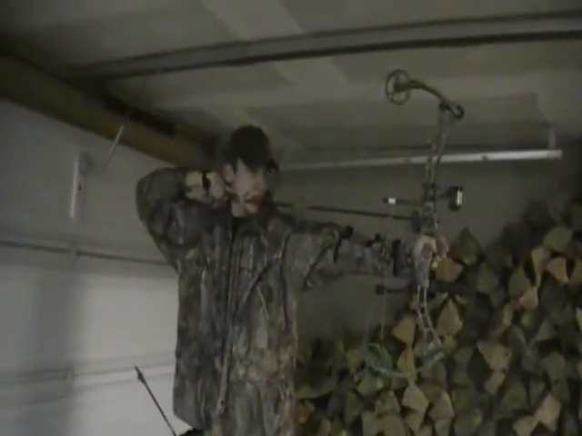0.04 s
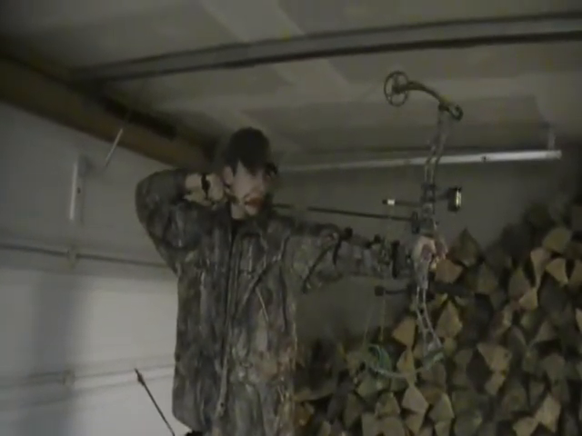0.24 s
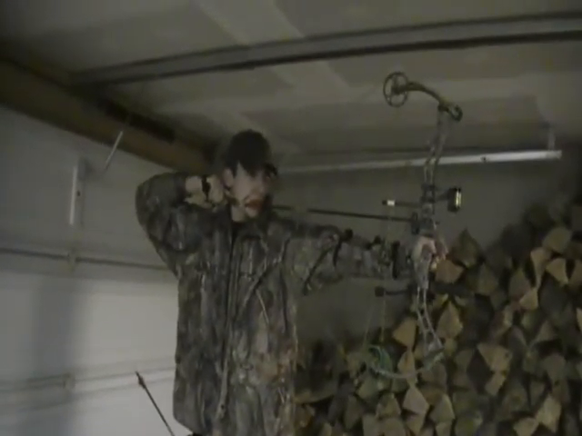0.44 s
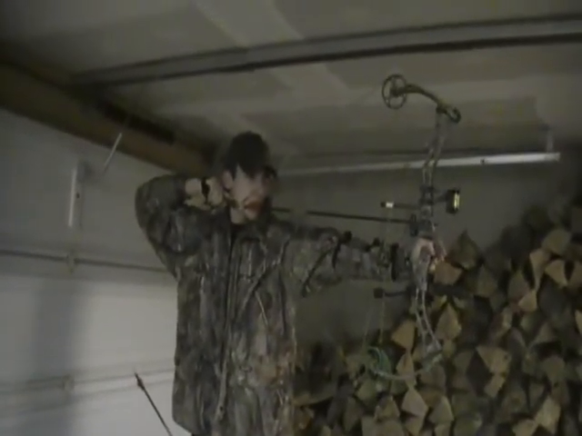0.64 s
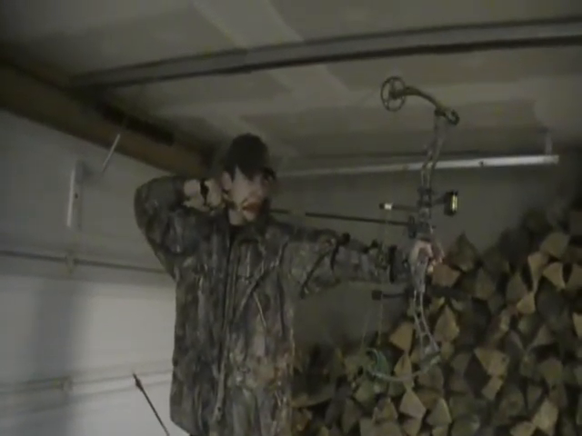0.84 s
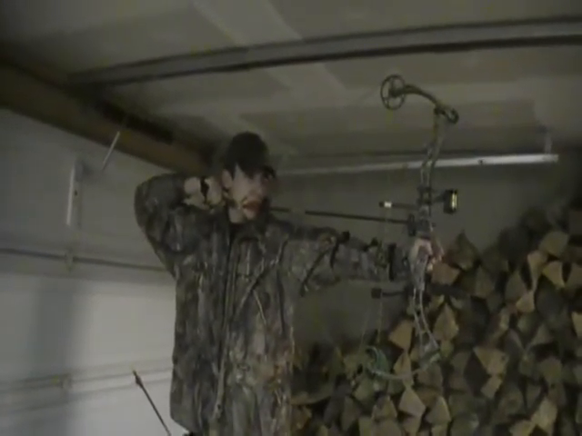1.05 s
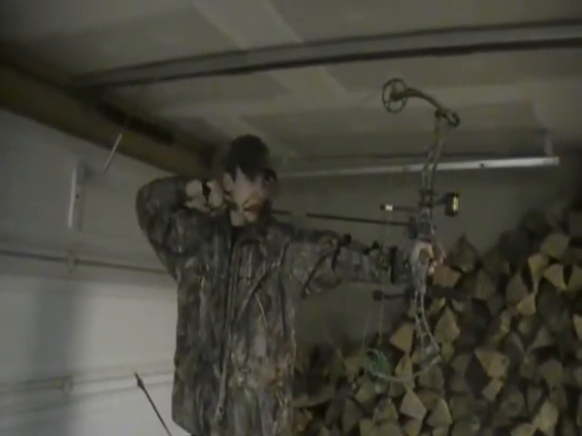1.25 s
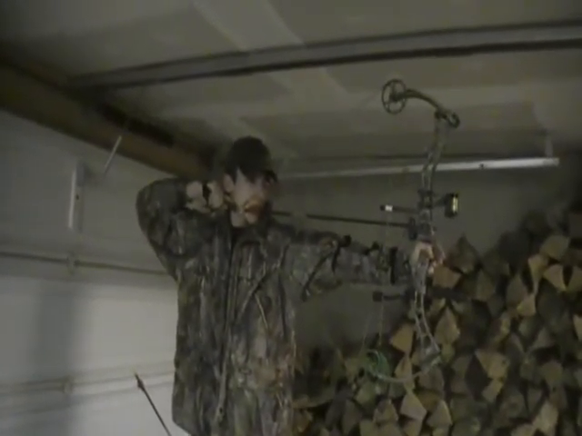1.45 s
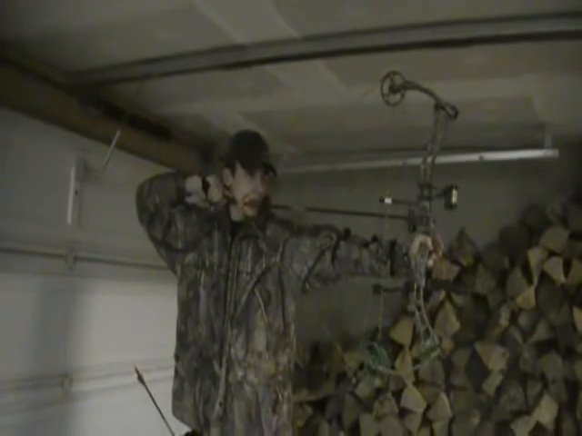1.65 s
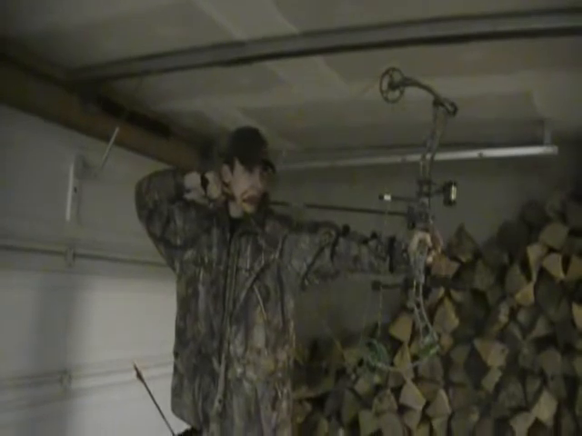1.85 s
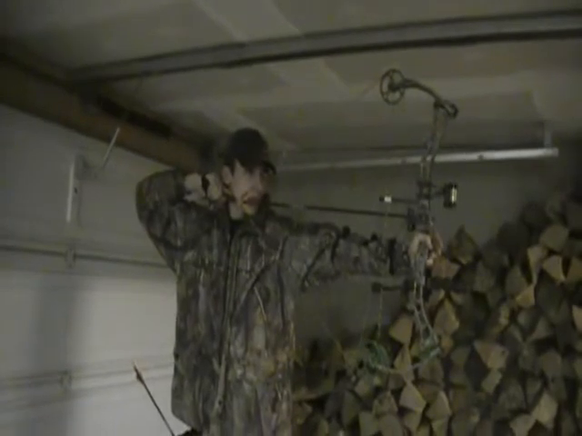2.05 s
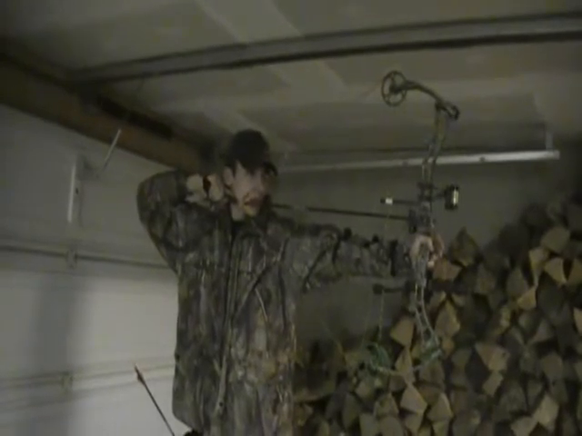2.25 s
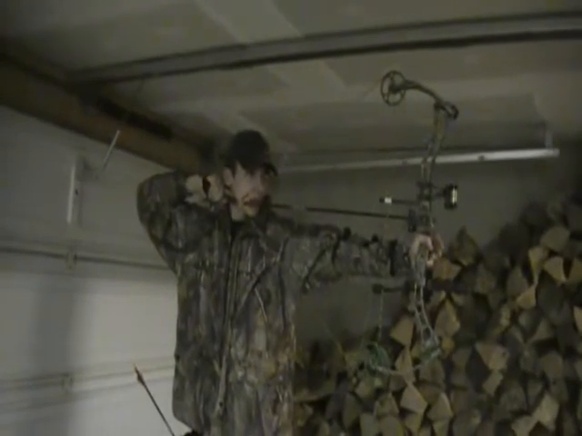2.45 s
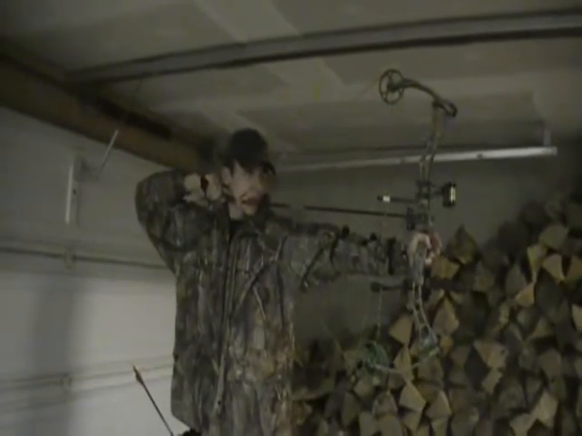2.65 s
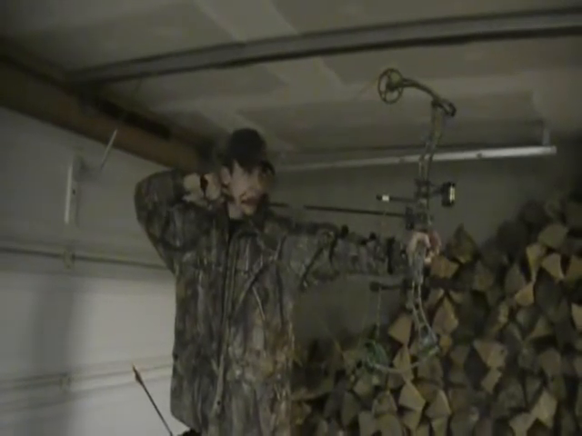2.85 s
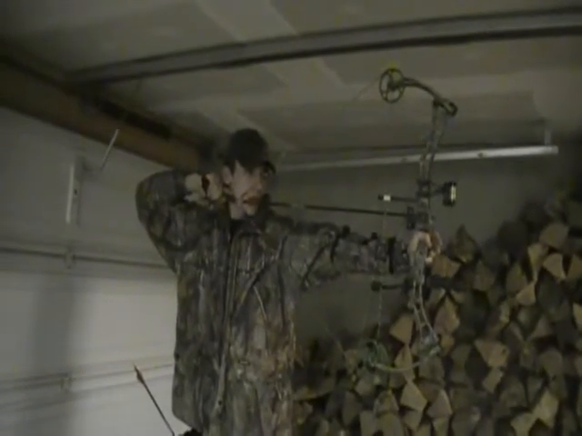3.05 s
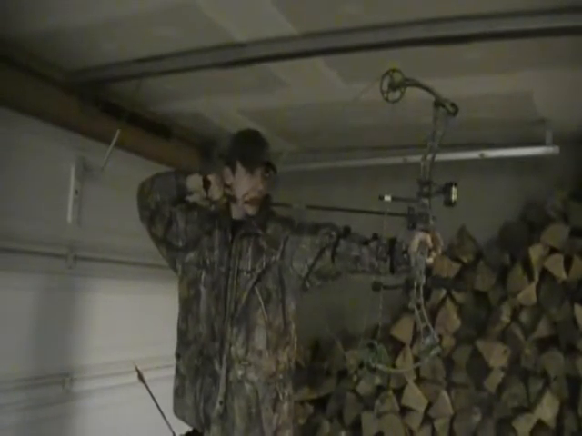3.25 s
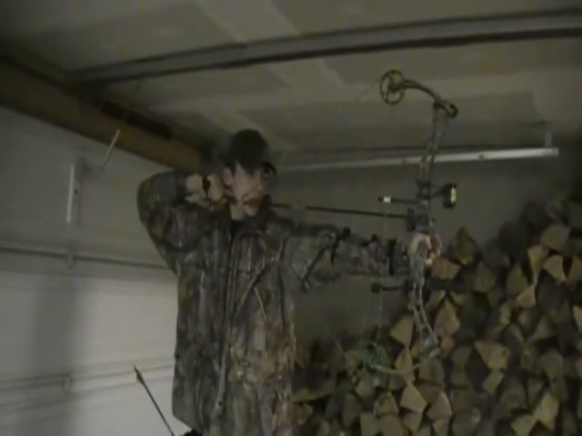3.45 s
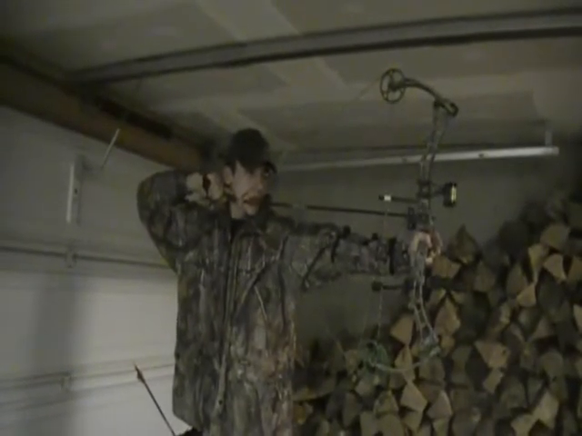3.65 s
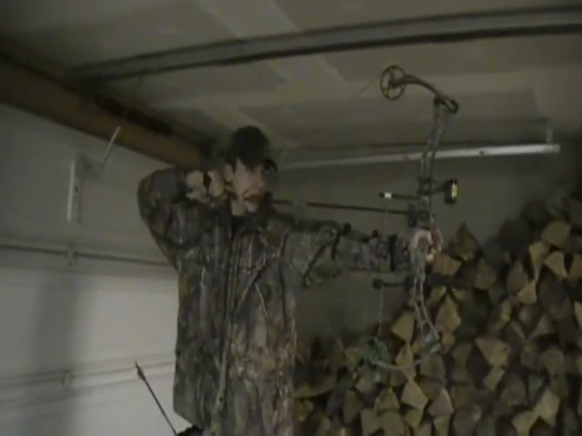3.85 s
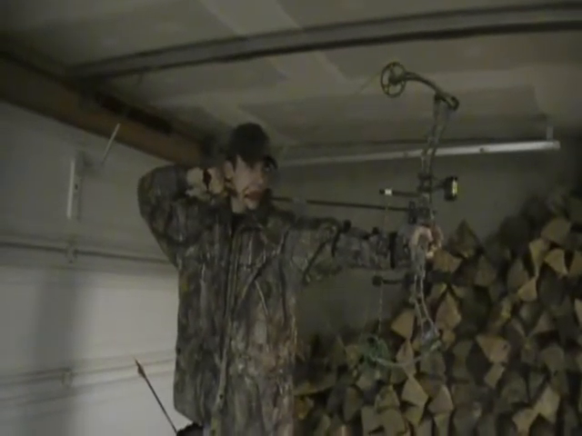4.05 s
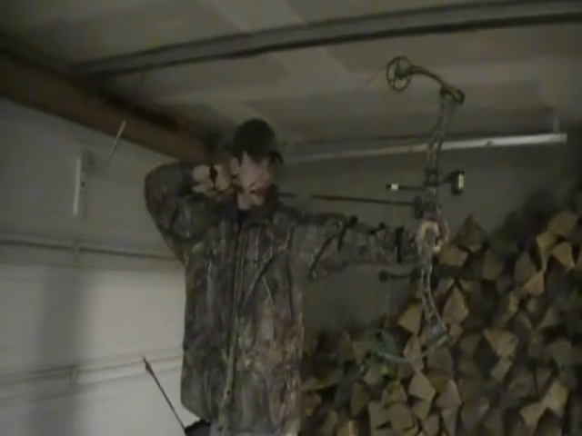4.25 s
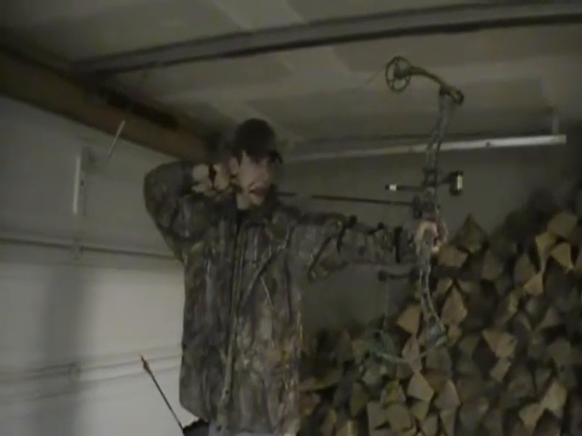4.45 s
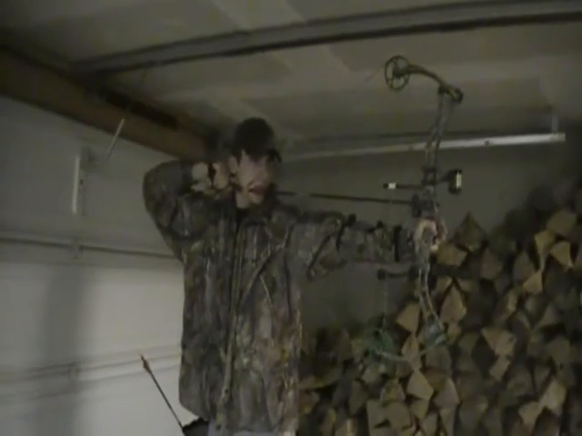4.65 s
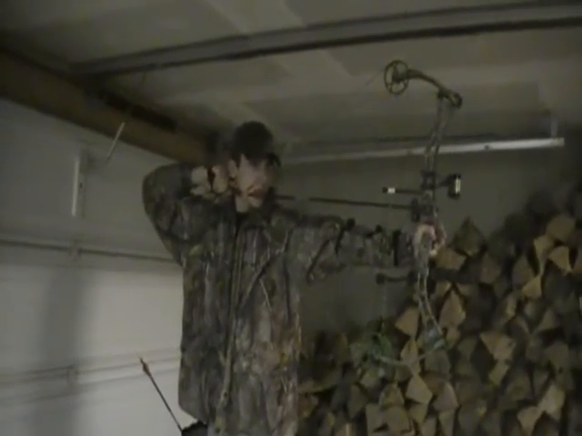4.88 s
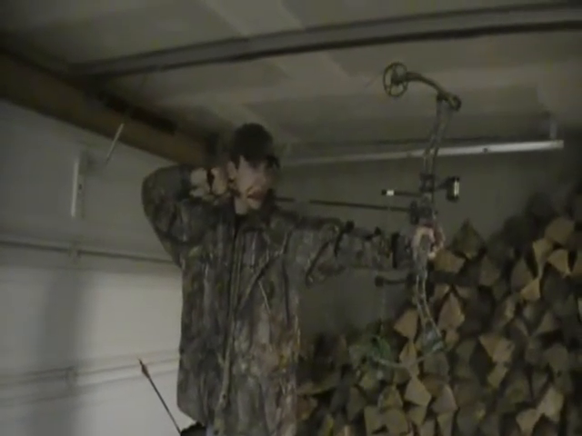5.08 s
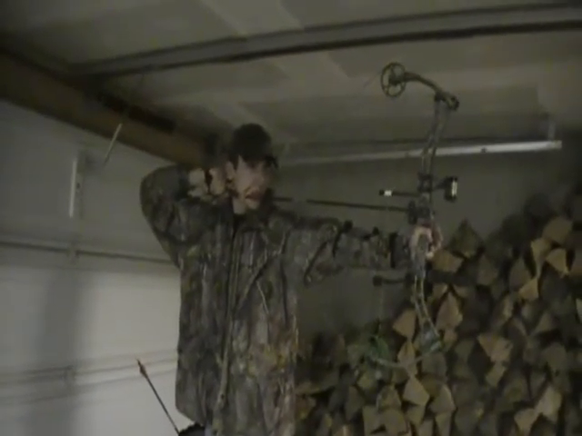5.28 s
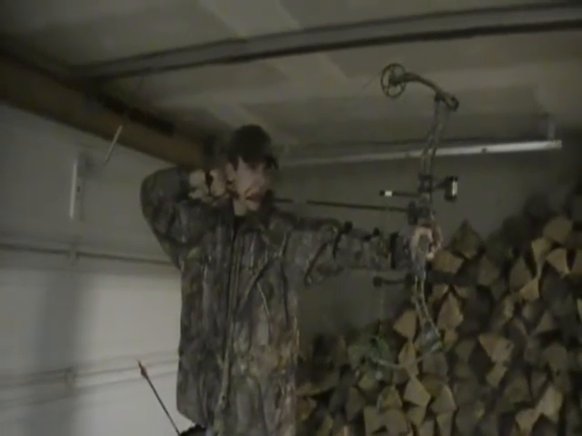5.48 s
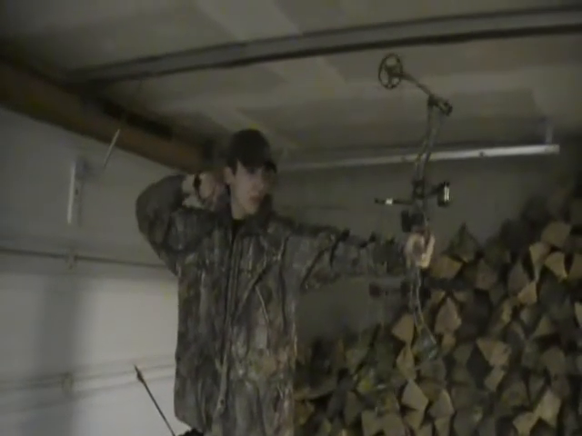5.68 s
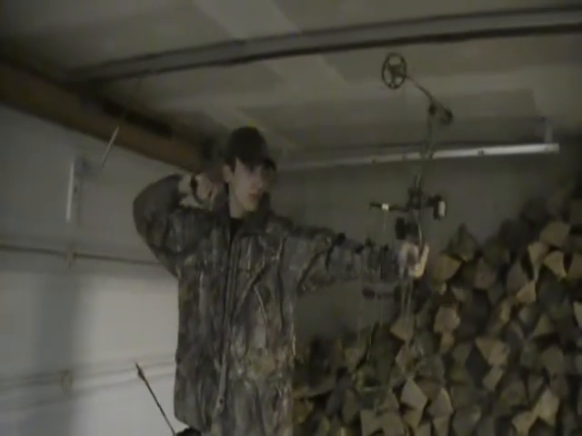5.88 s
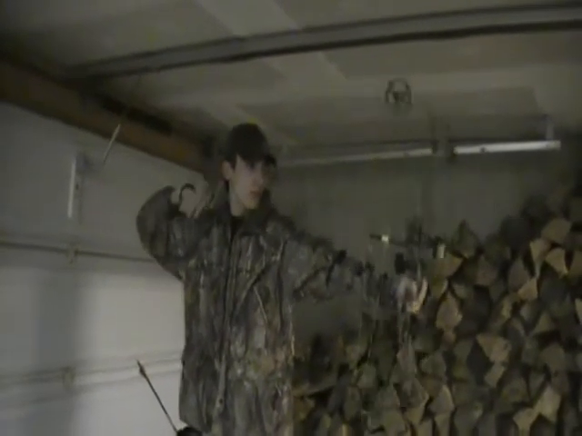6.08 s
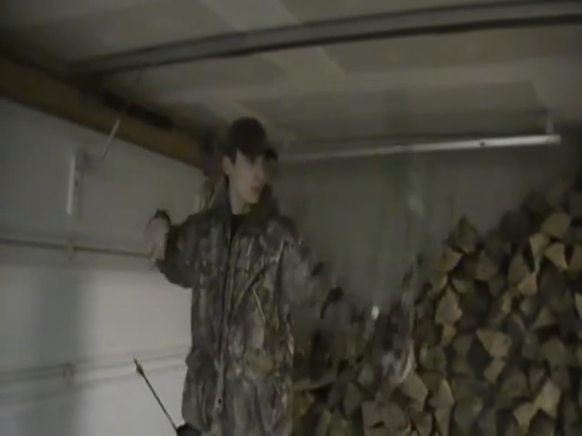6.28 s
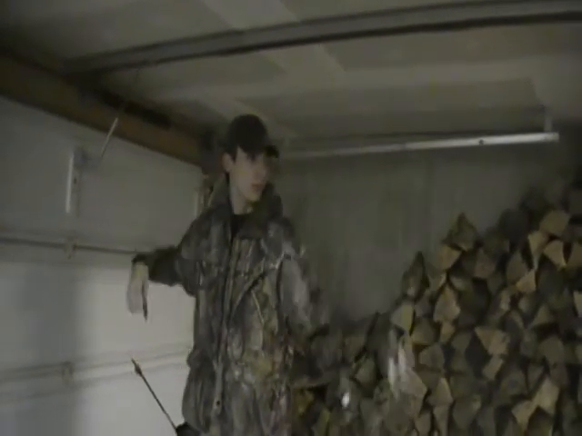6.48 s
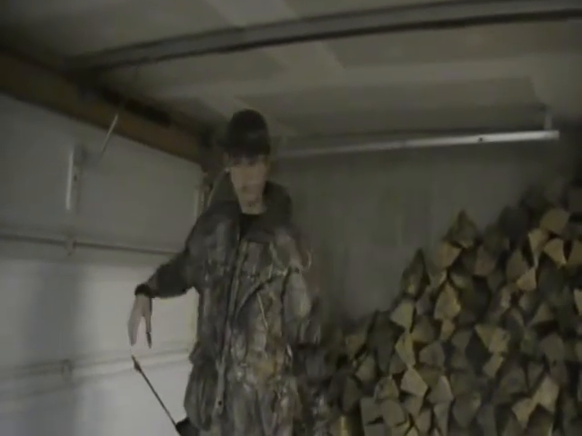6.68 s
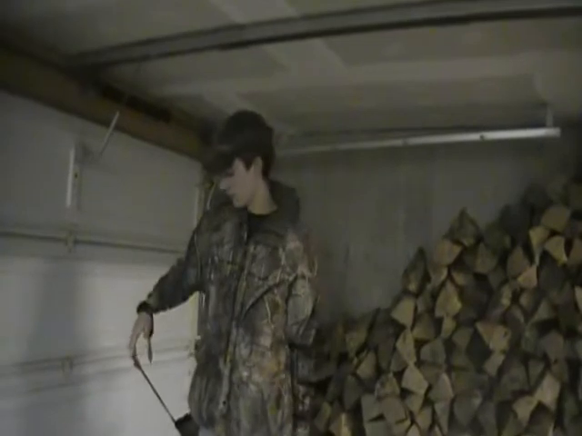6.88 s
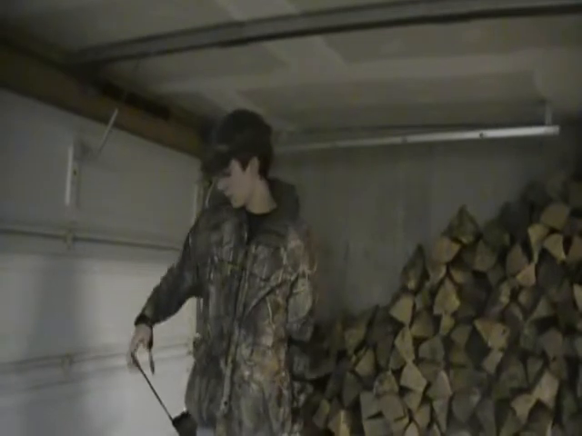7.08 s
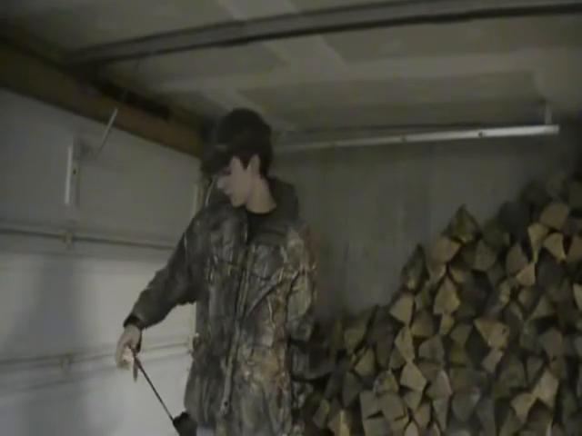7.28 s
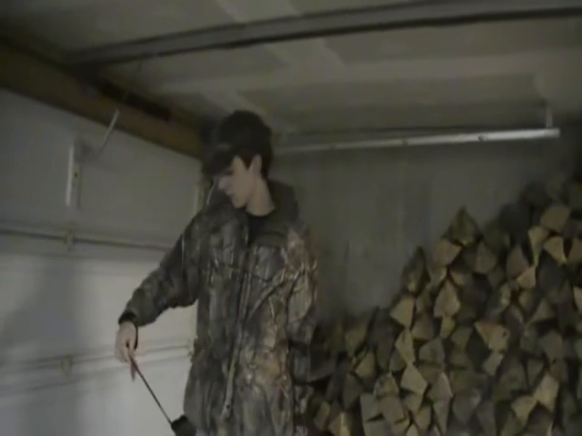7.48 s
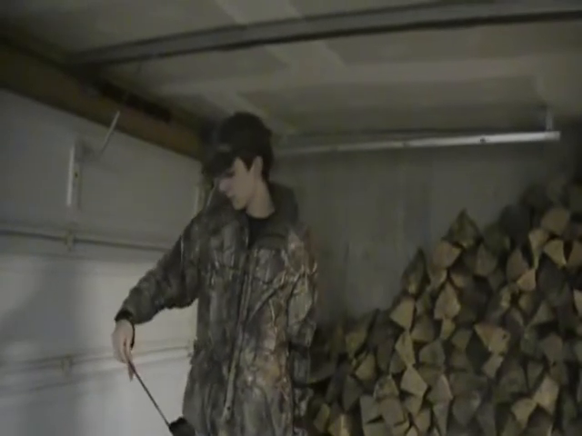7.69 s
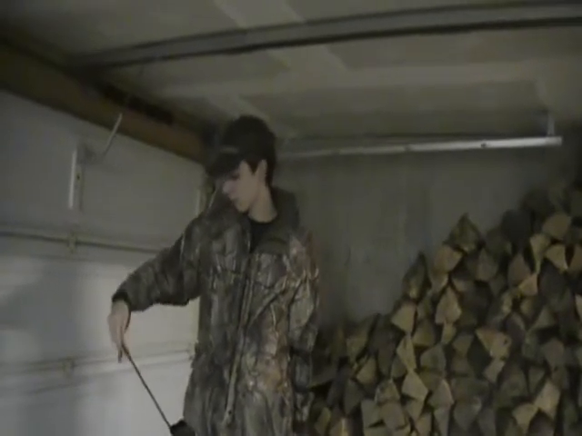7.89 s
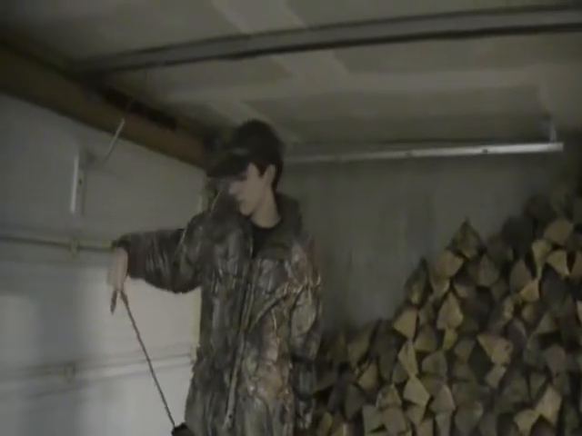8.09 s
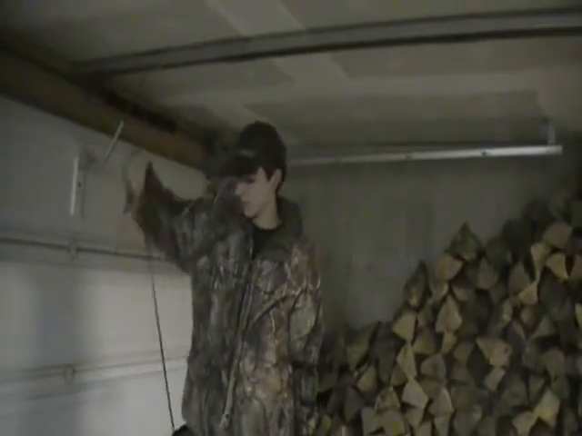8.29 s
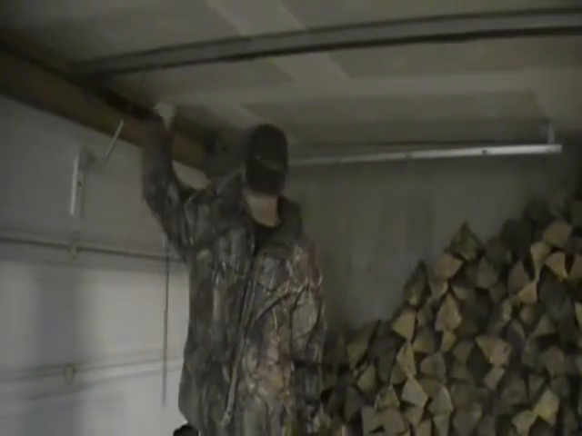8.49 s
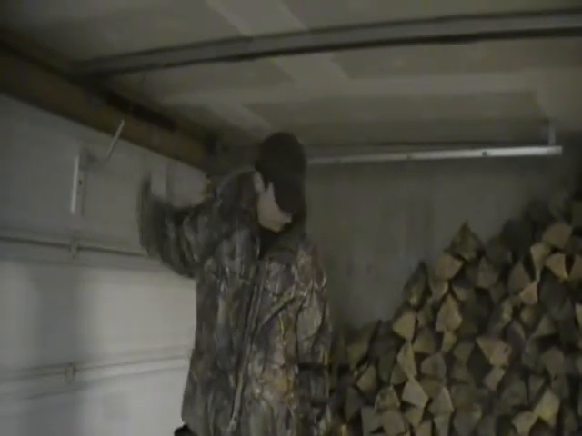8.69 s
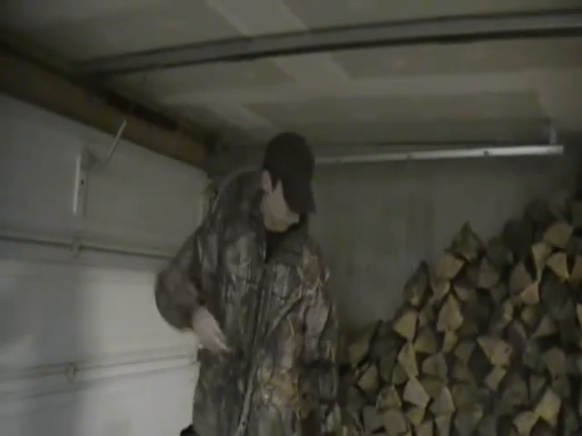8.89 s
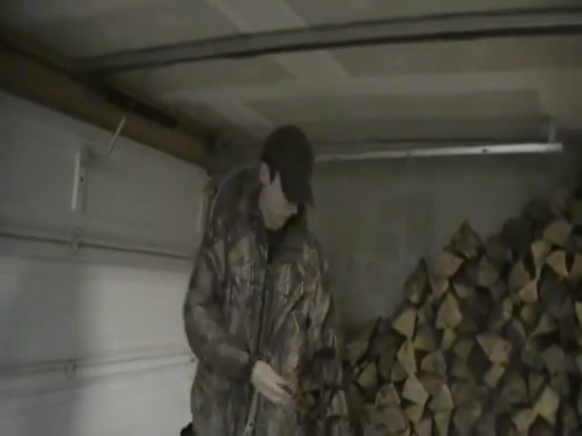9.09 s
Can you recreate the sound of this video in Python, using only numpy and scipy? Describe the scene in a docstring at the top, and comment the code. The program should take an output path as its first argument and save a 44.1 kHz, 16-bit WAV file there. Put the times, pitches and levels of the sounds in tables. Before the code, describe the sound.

In a quiet garage, close camera microphone hiss and brief lens-motor whirs fill a long hold, with one faint creak from the drawn bow. The release cracks very loudly, with a tiny zip and a low shudder; almost at once a distant target answers with a hard smack and a ringing tail. Then a jacket rustles softly, small parts tick, and an arrow scrapes out of its holder.

```python
"""Bow shot in a garage

A compound bow is held at full draw, close to a hissy camera whose lens motor whirs in runs over a faint idle.
The release snaps as sharp contacts, the arrow zips as a rising rub, and the limbs thump as ringing modes and
reverberation; a sixth of a second later a far target answers with a smack and a long tail.
The jacket swishes as bands of fluttering noise while the archer lowers the bow; the next arrow then slides
out of its holder as scuff, rasp, song and hiss that follow its speed, and is lifted clear with small ticks.
"""
import sys
import numpy as np
from scipy import signal
from scipy.fft import rfft, irfft, next_fast_len
from scipy.io import wavfile

SR = 44100
rng = np.random.default_rng(int(sys.argv[2]) if len(sys.argv) > 2 else 0)


def master(y):
    """Save y as 16-bit WAV."""
    cut = np.clip(np.atleast_2d(y).T, -1, 1)
    pcm = np.round(cut * 32767)  # scale
    wavfile.write(sys.argv[1], SR, pcm.astype(np.int16))


N = 402633
TIME = np.arange(N) / SR
CUTOFF_HZ = 15900

# Colour tables list freq_hz, relative_db_per_hz: only their shape counts, as the noise is scaled to rms 1.
# Contact tables list width_hz for a click shaped by two passes of a resonance, each twice that wide.

# release jaw, string and nock: start_s, peak_db, centre_hz, width_hz, decay_s
RELEASE_SNAPS = [(5.5444, -12, 8600, 1200, 0.00033), (5.5455, -8, 9150, 2500, 0.00098),
                 (5.5500, 1.5, 9700, 1810, 0.00028), (5.5512, -14, 9900, 3520, 0.015),
                 (5.5546, -10, 9350, 3020, 0.0011), (5.5693, -1, 10600, 2200, 0.00079),
                 (5.5472, -28.5, 1900, 1600, 0.0033), (5.5926, -16, 7000, 2500, .0009)]
# the shaft speeding over the rest: start_s, pitch_hz, level_db
SHAFT_ZIP = [(5.5620, 1607, -33), (5.5635, 1995, -23), (5.5664, 3310, -24), (5.5679, 4000, -3.5),
             (5.5685, 4400, -14), (5.5692, 5600, -9), (5.5712, 6300, -28)]
# limbs and riser jolted at the end of the stroke: freq_hz, relative_db_per_hz
BOW_COLOUR = [(59, -53), (100, -25), (137, -34), (233, -13.5), (420, -11), (467, -7), (564, -12.5),
              (977, -5.5), (1060, -9), (1230, -3.5), (2520, -12), (10600, -5.5), (15500, -12.5)]
# their ringing modes: pitch_hz, peak_db, t60_s
BOW_MODES = [(246, -46.5, 0.58), (454, -43.5, 0.86)]
BOW_S, BOW_DB = 5.572, -19.5

# the smack and its hard reflections, before the hollow is cut: start_s, peak_db, centre_hz, width_hz, decay_s
TARGET_SMACKS = [(5.7043, -17, 1700, 2200, .0015), (5.7045, -21, 6000, 3500, .001),
                 (5.7093, -10, 1500, 1000, .003), (5.7152, -7, 6000, 2500, .0006),
                 (5.7181, -1, 6500, 4500, .0004), (5.7199, -9, 6500, 3000, .0004),
                 (5.7448, -8, 7000, 2500, .0008)]
# arrow in the target, heard down the garage: freq_hz, relative_db_per_hz
TARGET_COLOUR = [(50, -45), (95, -17.5), (200, -11.5), (265, -8), (500, -5.5), (760, -7.5), (1050, -1.5),
                 (1600, -1), (2200, -7), (3100, -22), (4400, -7), (6600, 1.5), (8000, -6), (12500, -13),
                 (15500, -29)]
# the booms it sets off: pitch_hz, peak_db, t60_s
TARGET_MODES = [(100.7, -55.5, 1), (193, -50.5, 0.82), (269, -41.5, 0.84), (1067, -40, 0.56),
                (1095, -43, 0.53), (1536, -36, 0.31), (1620, -50, .45)]
TARGET_S, TARGET_DB = 5.7085, -19.5

# speed of the next arrow sliding out of its holder, as its rasp level before trims: start_s, level_db
SLIDE_SPEED = [(7.76, -57.5), (7.86, -46.5), (7.908, -53), (7.955, -40.5), (8.06, -37), (8.11, -37.5),
               (8.168, -33), (8.205, -36), (8.258, -36.5), (8.305, -45.5), (8.45, -61.5)]
# the shaft catches on the holder, scuffs and sets it ringing; levels before trims:
# start_s, length_s, scuff_db, ring_db
HOLDER_CATCHES = [(7.738, 0.02, -50.5, -52), (7.806, 0.04, -50, -72), (8.085, 0.037, -44.5, -49),
                  (8.243, 0.028, -43, -49.5)]
CATCH_ATTACK_S, CATCH_RELEASE_S, HOLDER_RELEASE_S = 0.0076, 0.035, 0.04
HOLDER_HZ = 329.3
# the shaft's dull scuff: freq_hz, relative_db_per_hz
SCUFF_COLOUR = [(110, -50), (180, -23.5), (269, -8), (326, -5), (457, -6.5), (564, -5), (709, -4),
                (777, -5), (1600, -8), (2080, -19.5), (3520, -120)]
# its rasp: freq_hz, relative_db_per_hz
RASP_COLOUR = [(100, -58), (710, -26), (1200, -5), (1720, 0), (2010, 0.5), (2370, -1.5), (2590, -3),
               (3350, -0.5), (3770, -4), (4560, -3.5), (5060, -10.5), (7000, -13.5), (9100, -43),
               (15400, -120)]
# its hiss: freq_hz, relative_db_per_hz
SHAFT_HISS_COLOUR = [(3820, -36), (6500, -8), (7020, -7.5), (9350, -0.5), (10800, -2), (12900, -6),
                     (14700, -15), (15500, -19)]
# the zing rises in pitch with speed, by up to the rise
ZING_REST_HZ, ZING_RISE_HZ = 1500, 1307
# the shaft sings at full speed: its resonance, and its level before the grip and the room
SHAFT_HZ, SHAFT_WIDTH_HZ, SHAFT_DB = 3430, 350, -40

# speed of the arms, lowering the bow then reaching for the arrow, as the shell level before a trim:
# start_s, level_db
ARM_SPEED = [(6.05, -70), (6.27, -58), (6.6, -55.5), (6.7, -52), (6.88, -54), (7.0, -54), (7.38, -58),
             (7.6, -60.5), (7.7, -57.5), (8.55, -57), (9.13, -58)]
# strokes of the sleeve down the jacket, before trims: start_s, length_s, rub_db, shell_db
SLEEVE_STROKES = [(8.6, 0.16, -45.5, -52.5), (8.84, 0.17, -58.5, -58)]
# the lowered bow drags on the jacket's folds: start_s, length_s, level_db
BOW_DRAGS = [(6.7, 0.21, -53.5)]
BRUSH_ATTACK_S, BRUSH_RELEASE_S = 0.08, 0.099
FOLDS_FOLLOW = 0.88  # dB of the folds per dB of the arms
# the jacket's shell sliding: freq_hz, relative_db_per_hz
SHELL_COLOUR = [(3820, -46), (6500, -7.5), (8290, -4), (10600, -1), (12000, -5.5), (13400, -6.5),
                (15500, -17.5)]
# its folds rubbing: freq_hz, relative_db_per_hz
FOLDS_COLOUR = [(120, -39), (200, -8), (385, 0), (444, -4.5), (476, 1), (542, -6), (661, 1), (730, -3.5),
                (930, -5.5), (1600, -7), (1920, -2), (3700, -10), (6000, -10.5), (7800, -37), (13200, -120)]
# the sleeve's rub: freq_hz, relative_db_per_hz
SLEEVE_COLOUR = [(100, -46), (170, -20), (233, -10), (268, 2), (318, -9), (390, -11.5), (429, -6.5),
                 (615, -13), (665, -7.5), (802, -12), (938, -8), (1150, -18), (1990, -7), (3240, -10.5),
                 (4230, -6.5), (5870, -15), (7200, -24), (9360, -50), (15800, -120)]
# the sleeve's weave singing when it slides fast: pitch_hz, width_hz of each resonance pass,
# level_db against the untrimmed rub at full speed
WEAVE_SONG = [(4340, 930, -5.5), (10650, 1300, -4)]

# bright ticks of the arrow and the wrist release: start_s, peak_db, centre_hz, width_hz, decay_s
ARROW_TICKS = [(6.4535, -33, 9850, 2800, 0.004), (7.782, -35, 9000, 3000, 0.002),
               (8.458, -25, 11000, 4000, 0.0006), (8.4582, -30, 12250, 200, 0.001),
               (8.4628, -28, 8000, 2800, 0.00095), (8.4645, -22.5, 10500, 3500, 0.002),
               (8.469, -20.5, 9200, 4000, 0.0007), (9.042, -33.5, 9500, 2800, 0.0073)]
# duller knocks of bow and arrow being handled: start_s, peak_db, centre_hz, decay_s
HANDLING_KNOCKS = [(6.886, -39.5, 1500, 0.014), (7.742, -31, 3020, 0.0035), (7.750, -39, 1900, 0.0022),
                   (7.785, -36, 2500, 0.004), (7.81, -27.5, 1370, 0.0043), (7.814, -31.5, 2200, 0.0022),
                   (8.4648, -36, 3790, 0.0037)]
KNOCK_WIDTH_SHARE = 0.87  # of the centre frequency
# small fittings of the bow clink: start_s, level_db
FITTING_CLINKS = [(6.660, -40), (6.667, -43)]
# modes of those fittings: pitch_hz, level_db against the clink, width_hz
FITTING_MODES = [(1430, -10.5, 48), (2170, -4, 120), (2750, -2.5, 99), (4400, -7.5, 160), (8530, -2, 200)]
# the gripped shaft rattles in its holder: level is the middle of a random spread
RATTLE_S, RATTLE_LENGTH_S, RATTLE_DB, RATTLE_HZ = 7.76, 0.14, -40, 3200

# the loaded bow creaks once: each gap between slips is longer than the last, up to a limit
CREAK_S, CREAK_DB = 2.336, -47.5
SLIP_FIRST_GAP_S, SLIP_LONGEST_GAP_S, SLIP_SLOWING = 0.0065, 0.0175, 1.25

# still air and microphone hiss: freq_hz, relative_db_per_hz
HISS_COLOUR = [(15, -35), (25, -1.5), (49, -9), (148, 0.5), (331, 0), (421, -1.5), (582, -2.5), (1950, -8),
               (2170, -8.5), (2420, -9), (2850, -10), (7100, -15), (8130, -15), (11200, -17),
               (15500, -24.5)]
HISS_DB = -58.5
# camera electronics: pitch_hz, rms_db
CAMERA_WHINE = [(7854, -85), (7881, -84.5)]
# runs of the lens motor, before a trim: start_s, length_s, level_db
LENS_RUNS = [(0.12, 0.38, -67), (0.63, 0.87, -66), (2.2, 0.2, -66), (2.59, 0.14, -66.5), (3.02, 0.037, -73),
             (3.37, 0.57, -66), (4.12, 0.13, -64.5), (4.46, 0.11, -64.5)]
LENS_SPIN_UP_S, LENS_SPIN_DOWN_S = 0.041, 0.06
LENS_IDLE_DB = -81  # before the same trim

# garage reverberation: freq_hz, t60_s
GARAGE_DECAY = [(100, 1.0), (400, 1), (1500, 0.81), (3000, 0.84), (6000, 0.59), (9000, 0.46), (14000, 0.36)]


def shot():
    """Release snaps and shaft zip, then the limbs stop the string and the whole bow shudders."""
    out = in_garage(contacts(RELEASE_SNAPS) + arrow_zip(), wet_db=-11.5, length=0.22)
    shudder = reverberation(BOW_COLOUR, length=0.61, build_s=0.0017)
    add(out, BOW_S, from_db(BOW_DB) * shudder + ring(BOW_MODES))
    return out


def arrow_zip(rough=0.49):
    """The rub of the shaft, a tone plus noise, rises in pitch as the string accelerates it."""
    s, hz, db = np.transpose(SHAFT_ZIP)
    phase = 2 * np.pi * np.cumsum(np.interp(TIME, s, hz)) / SR
    grain = noise([(200, -22), (1000, -5.5), (4000, -5), (16000, -7)])
    rub = np.sin(phase) + rough * grain
    level, = gains(np.c_[s, db], fade_db_per_s=8000)
    return level * rub


def target(hollow_hz=3200, hollow_width_hz=1800):
    """The far hit: thud and slap with a spectral hollow between, mostly reflections and a long tail."""
    hollow = signal.iirnotch(hollow_hz, hollow_hz / hollow_width_hz, fs=SR)
    out = signal.lfilter(*hollow, contacts(TARGET_SMACKS))
    tail = reverberation(TARGET_COLOUR, length=1.03, build_s=0.0015)
    add(out, TARGET_S, from_db(TARGET_DB) * tail + ring(TARGET_MODES))
    return out


def next_arrow(zing_width_hz=450, scuff_follows=0.66, hiss_follows=1.19, song_follows=2.6):
    """The shaft catches and slides, its layers and zing following speed; the holder rings one low note."""
    bright, = gains(SLIDE_SPEED, fade_db_per_s=303)
    speed = bright / bright.max()
    caught = strokes(HOLDER_CATCHES, CATCH_ATTACK_S, CATCH_RELEASE_S)[0]
    boom = strokes(HOLDER_CATCHES, CATCH_ATTACK_S, HOLDER_RELEASE_S)[1]
    grip = flutter(220, depth_db=1.1)

    # low noise moved up to the zing's gliding pitch
    turns = np.cumsum(ZING_REST_HZ + ZING_RISE_HZ * speed) / SR
    low_pass = signal.butter(2, zing_width_hz, fs=SR, output="sos")
    uneven = signal.sosfilt(low_pass, rng.standard_normal(N))
    zing = rms_one(uneven * np.cos(2 * np.pi * turns))

    scuff_level = np.hypot(caught, from_db(-45.5) * speed ** scuff_follows)
    scuff = scuff_level * noise(SCUFF_COLOUR) * flutter(70, depth_db=2.0)
    rasp = bright * (from_db(-1.5) * noise(RASP_COLOUR) + from_db(-9) * zing)
    song = from_db(SHAFT_DB) * speed ** song_follows * narrow_noise(SHAFT_HZ, SHAFT_WIDTH_HZ)
    hiss_level = from_db(-36.5) * speed ** hiss_follows
    hiss = hiss_level * noise(SHAFT_HISS_COLOUR) * flutter(700, depth_db=0.5)
    holder = from_db(-1) * boom * narrow_noise(HOLDER_HZ, width_hz=18)
    return in_garage(grip * (scuff + rasp + song + hiss), wet_db=-8.0, length=0.13) + holder


def jacket():
    """Cloth slides with a fine grain: a bright shell, duller folds, then a sleeve whose weave sings at speed."""
    arms, = gains(ARM_SPEED)
    brush, brush_swish = strokes(SLEEVE_STROKES, BRUSH_ATTACK_S, BRUSH_RELEASE_S)
    shell_level = from_db(0.1) * (arms + brush_swish)
    shell = shell_level * noise(SHELL_COLOUR) * flutter(500, depth_db=1.0)

    drag, = strokes(BOW_DRAGS, BRUSH_ATTACK_S, BRUSH_RELEASE_S)
    rub = np.hypot(drag, from_db(-52.5) * (arms / arms.max()) ** FOLDS_FOLLOW)
    folds = rub * noise(FOLDS_COLOUR) * flutter(90, depth_db=0.4)

    threads = rng.standard_normal(N)
    weave = np.zeros(N)
    for hz, width_hz, db in WEAVE_SONG:
        weave += from_db(db) * rms_one(resonate_twice(threads, hz, width_hz))
    speed = brush / brush.max()
    cloth = from_db(-1.0) * noise(SLEEVE_COLOUR) + speed * weave
    sleeve = brush * cloth * flutter(300, depth_db=0.9)
    return shell + folds + sleeve


def handling(clink_decay_s=0.0014):
    """Short hard contacts of bow and arrow in the hands: ticks, knocks, clinks and a rattle in the room."""
    knocks = [(s, db, hz, KNOCK_WIDTH_SHARE * hz, decay) for s, db, hz, decay in HANDLING_KNOCKS]
    clinks = [(s, db + mode_db, hz, width_hz, clink_decay_s)
              for s, db in FITTING_CLINKS
              for hz, mode_db, width_hz in FITTING_MODES]
    return in_garage(contacts(ARROW_TICKS + knocks + clinks + rattle()), wet_db=-3.5, length=0.31)


def rattle(count=9, spread_db=2.5, width_hz=2200, decay_s=0.0012):
    """The shaft touches its holder lightly at random times and forces; returns rows of contacts."""
    rows = []
    for when, force in rng.random((count, 2)):
        start_s = RATTLE_S + RATTLE_LENGTH_S * when
        peak_db = RATTLE_DB + spread_db * (2 * force - 1)
        rows.append((start_s, peak_db, RATTLE_HZ, width_hz, decay_s))
    return rows


def creak(hz=520, width_hz=190, decay=0.00092, count=10):
    """The loaded bow sticks and slips, slower and slower; each slip is one dull, dry pulse."""
    gaps = np.minimum(SLIP_FIRST_GAP_S * SLIP_SLOWING ** np.arange(count), SLIP_LONGEST_GAP_S)
    times = CREAK_S + np.cumsum(gaps) - gaps
    levels = CREAK_DB + rng.normal(0, 1.1, count)
    slips = [(s, db, hz, width_hz, decay) for s, db in zip(times, levels)]
    return contacts(slips, grit=0.02)


def camera():
    """Steady hiss, a thin electronic whine and the lens motor's narrow whir, in uneven runs over a faint idle."""
    whine = sum(from_db(db) * np.sqrt(2) * np.sin(2 * np.pi * hz * TIME) for hz, db in CAMERA_WHINE)
    whir = narrow_noise(2216, width_hz=290)
    runs, = strokes(LENS_RUNS, LENS_SPIN_UP_S, LENS_SPIN_DOWN_S)
    motor = (runs + from_db(LENS_IDLE_DB)) * flutter(14, depth_db=0.5)
    return from_db(HISS_DB) * noise(HISS_COLOUR) + whine + from_db(-1.8) * motor * whir


def contacts(rows, grit=0.35):
    """Each contact is a sharp edge and a dying crunch, coloured by the part that is hit."""
    out, t = np.zeros(N), TIME[:SR // 8]
    for s, peak_db, hz, width_hz, decay in rows:
        force = grit * rng.standard_normal(len(t)) * np.exp(-t / decay)
        force[0] += 1
        click = resonate_twice(force, hz, 2 * width_hz)
        add(out, s, from_db(peak_db) * click / np.abs(click).max())
    return out


def ring(modes):
    """Struck modes: sines dying away, each by 60 dB in its t60."""
    t = TIME[:2 * SR]
    return sum(from_db(db - 60 * t / t60) * np.sin(2 * np.pi * hz * t) for hz, db, t60 in modes)


def reverberation(spectrum, length, build_s, build_cycles=0.58):
    """Reflections build up, later in the bass, then each half octave dies at its own rate."""
    t = TIME[:2 * SR]
    echoes = rfft(noise(spectrum, size=len(t)))
    centres = np.geomspace(60, 16000, 17)
    hz, out = np.arange(len(echoes)) * SR / len(t), 0
    for centre, share in zip(centres, np.eye(len(centres))):
        band = irfft(echoes * np.interp(hz, centres, share))
        build = 1 - np.exp(-t / (build_s + build_cycles / centre))
        t60 = length * at_hz(GARAGE_DECAY, centre)  # length scales the garage's decay
        out = out + band * build * np.exp(-np.log(1000) * t / t60)
    return out * flutter(320, depth_db=0.05)[:len(t)]


def in_garage(x, wet_db, length):
    """A nearby sound followed by the room's answer, convolved with a unit-energy noise tail."""
    room = reverberation([(100, 0), (16000, 0.013)], length, build_s=0.0013)
    return x + from_db(wet_db) * signal.fftconvolve(x, room / np.linalg.norm(room))[:N]


def strokes(rows, attack_s, release_s):
    """Each row swells, holds for its length and dies away; one gain in time per dB column."""
    out = 0
    for start, length, *levels_db in rows:
        swell = np.clip((TIME - start) / attack_s, 0, 1)
        release = np.exp(-np.clip((TIME - start - length) / release_s, 0, 20))
        out = out + np.outer(from_db(levels_db), swell * release)
    return out


def gains(rows, fade_db_per_s=250):
    """Each dB column of a curve as a gain in time, fading away outside its span."""
    s, *columns = np.transpose(rows)
    outside = np.abs(TIME - np.clip(TIME, s[0], s[-1]))
    fade = np.minimum(fade_db_per_s * outside, 200)
    return [from_db(np.interp(TIME, s, c) - fade) for c in columns]


def flutter(rate, depth_db):
    """A gain that wanders by chance, with rate random steps a second."""
    steps = rng.standard_normal(N // 20)
    return from_db(depth_db * np.interp(TIME * rate, np.arange(len(steps)), steps))


def noise(spectrum, size=N):
    """Noise of a given colour, rms 1."""
    n = next_fast_len(size)
    colour = from_db(at_hz(spectrum, np.arange(n // 2 + 1) * SR / n))
    return rms_one(irfft(rfft(rng.standard_normal(n)) * colour, n)[:size])


def narrow_noise(hz, width_hz):
    """A resonance kept going by friction, rms 1."""
    return rms_one(resonate_twice(rng.standard_normal(N), hz, width_hz))


def resonate_twice(x, hz, width_hz):
    """Two passes of one resonance, for steeper sides."""
    return resonate(resonate(x, hz, width_hz), hz, width_hz)


def resonate(x, hz, width_hz):
    """One resonance with unit gain on top."""
    peak = signal.iirpeak(min(hz, 0.45 * SR), hz / min(width_hz, 0.4 * SR), fs=SR)
    return signal.lfilter(*peak, x)


def at_hz(points, hz):
    """Read a table along log frequency."""
    f, value = np.transpose(points)
    return np.interp(np.log(np.maximum(hz, 1)), np.log(f), value)


def add(out, s, sound):
    """Mix a sound in at a time."""
    i = int(round(s * SR))
    out[i:i + len(sound)] += sound[:N - i]


def from_db(db):
    """Decibels to gain."""
    return 10 ** (np.asarray(db) / 20)


def rms_one(x):
    """Scale to unit power."""
    return x / np.sqrt(np.mean(x ** 2) + 1e-20)


def scene():
    """Everything at one microphone."""
    return (camera() + creak() + shot() + target() + jacket() + next_arrow() + handling())[None]


def record(dry):
    """Peaks clip at full scale, then the deepest bass and the top are cut."""
    low_cut = signal.butter(1, 30, "high", fs=SR, output="sos")
    top_cut = signal.ellip(10, 0.1, 80, CUTOFF_HZ, fs=SR, output="sos")
    clipped = np.clip(dry, -1, 1)
    return signal.sosfilt(top_cut, signal.sosfilt(low_cut, clipped))


dry = scene()
out = record(dry)
master(out)
```